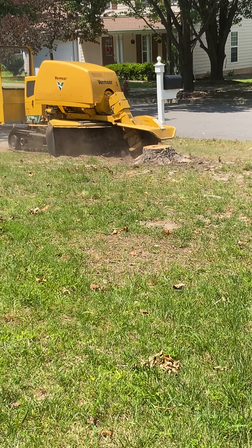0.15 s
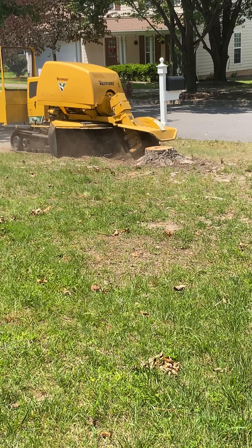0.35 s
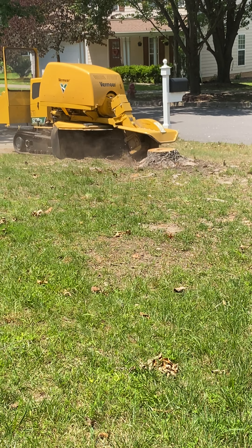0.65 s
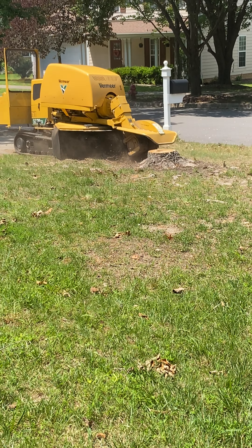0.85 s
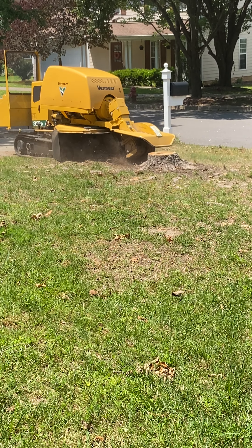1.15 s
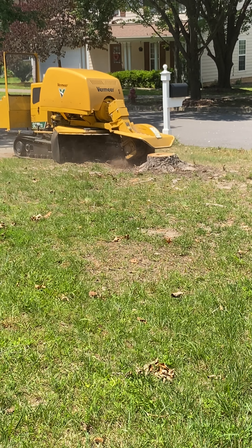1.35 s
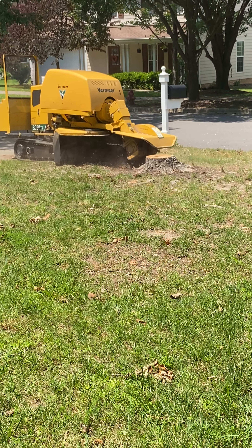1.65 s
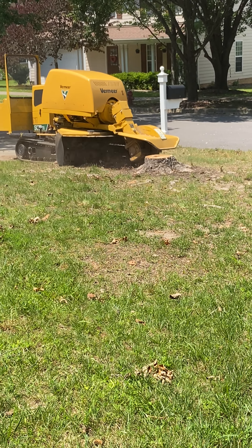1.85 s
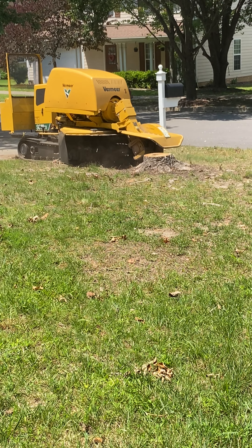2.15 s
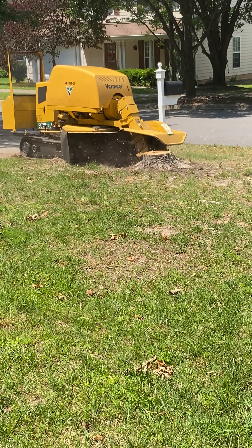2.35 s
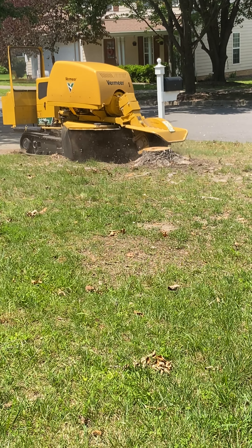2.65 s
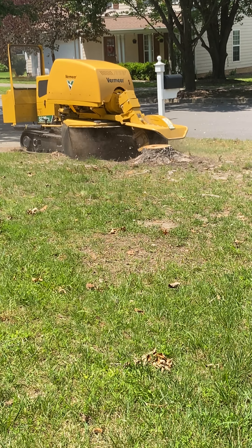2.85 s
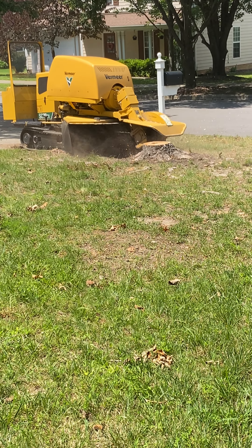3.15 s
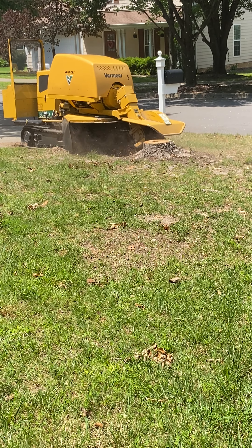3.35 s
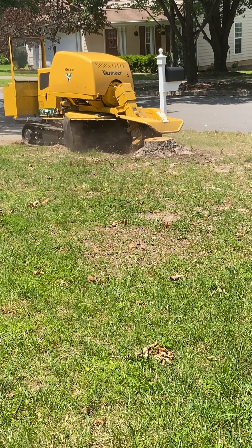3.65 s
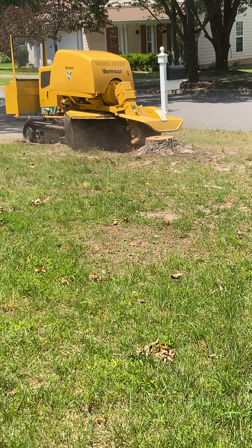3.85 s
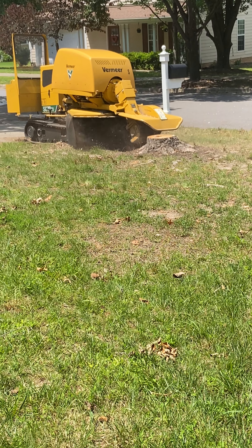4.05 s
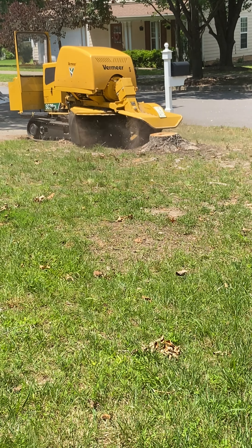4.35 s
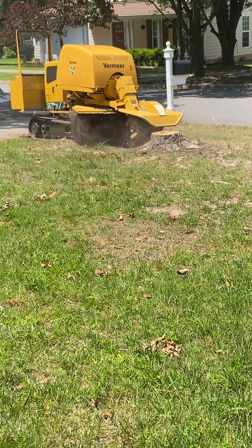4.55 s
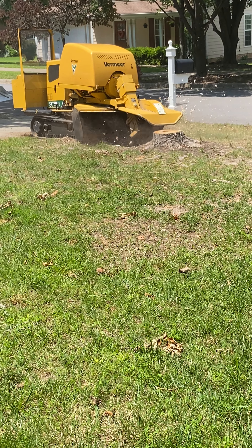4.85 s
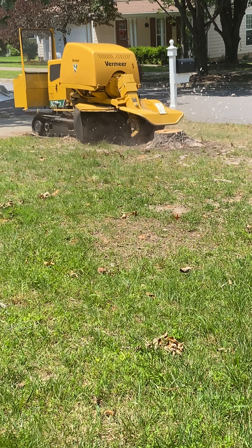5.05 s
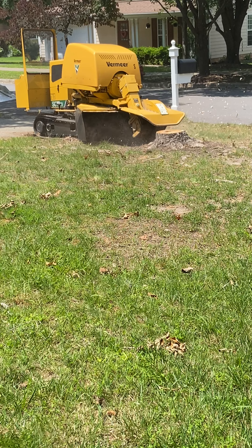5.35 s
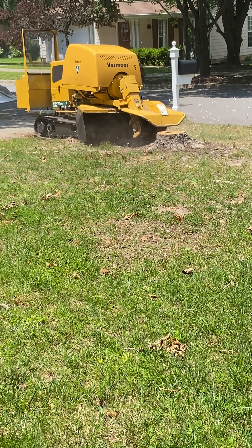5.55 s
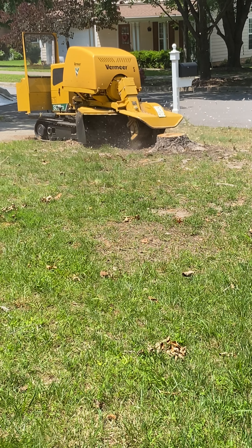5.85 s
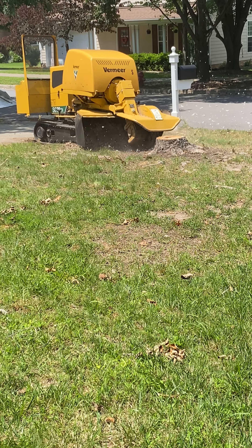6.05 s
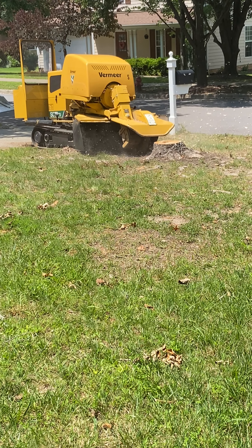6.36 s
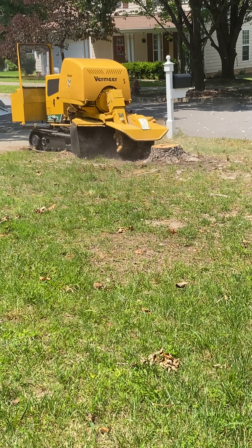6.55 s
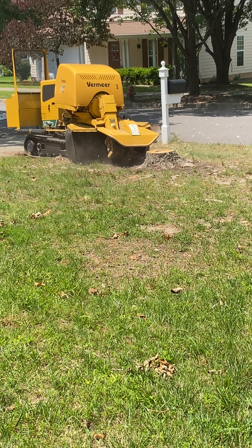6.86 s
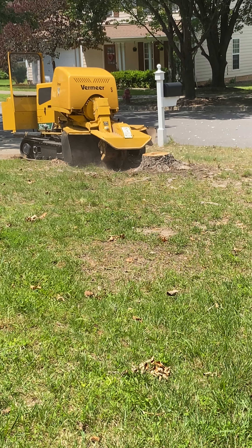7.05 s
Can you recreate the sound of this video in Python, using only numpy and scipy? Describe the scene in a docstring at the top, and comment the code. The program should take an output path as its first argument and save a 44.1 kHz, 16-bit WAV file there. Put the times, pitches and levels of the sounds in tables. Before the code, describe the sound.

A tracked grinder's engine hums continuously with fan whine and mechanical clatter. A light rasping pass with stone clacks, dull root booms and a gritty scrape gives way to a lull with a few ticks. Then a heavy pass crunches through wood, with hammering chatter, ringing steel and rough singing tones, pulling the engine pitch down before it climbs back. Open yard, slightly dull sound at moderate distance, faint house-front reflections.

```python
"""A stump grinder works outdoors: from the start its four-cylinder diesel drones while the toothed wheel thumps,
rasps and sprays chips. Stones clack, roots boom and squeaks flash by in both sweeps; a short scrape comes
near 0.6 s. From about 0.9 s the cutting fades; at 2.3 s the wheel goes back through the stump, steel and wood
sing, the wheel chatters, the guard clangs and chunks tear loose. The engine sags most near 5 s, then recovers.
Sines make the engine tones and filtered random blows the cutting; house fronts return a faint tail throughout."""
import sys
import numpy as np
from scipy import signal
from scipy.fft import rfft, irfft, next_fast_len
from scipy.io import wavfile
from scipy.ndimage import map_coordinates

SR = 44100
rng = np.random.default_rng(int(sys.argv[2]) if len(sys.argv) > 2 else 0)


def dump(signal):
    """Clip the signal to [-1, 1] and save it as 16-bit WAV at the path in sys.argv[1]."""
    limited = np.clip(np.atleast_2d(signal).T, -1, 1)
    pcm = np.round(limited * 32767).astype(np.int16)
    wavfile.write(sys.argv[1], SR, pcm)


N = 317520

# ringing notes of the steel guard and housing: (frequency [Hz], width [Hz], relative level [dB])
GUARD_MODES = [(905, 25, -2), (946, 23, -0.5), (1011.4, 23, 1), (1162, 19, 3.5), (1211, 24.4, 5),
               (1440, 59, -6), (1600, 77, -1), (1648, 45, -1), (1764, 34, 1.5), (2352, 68, -4.5)]
# bite of the teeth in the second sweep, back through the stump: (time [s], level [dB])
SECOND_SWEEP_BITE = [(2.29, -27.5), (2.43, -22), (2.69, -21.5), (2.745, -25), (2.77, -28.5), (2.87, -32.5),
                     (3.01, -29.5), (3.03, -34), (3.05, -26.5), (3.14, -19), (3.4, -23.5), (3.67, -20.5),
                     (3.82, -26.5), (4.22, -24.5), (4.42, -22), (4.75, -20.5), (5.16, -25.5), (5.19, -19),
                     (5.35, -24.5), (6.12, -27.5), (6.41, -24), (6.43, -28), (6.94, -34), (6.97, -36.5),
                     (7.2, -42)]
# lull in the skirt boom and overtone load: (start [s], end [s], fade [s], drop [dB])
BOOM_LULL = (1.01, 1.71, 0.17, 20)
# the wheel chatters in the deepest cuts: (start [s], end [s], level [dB])
CHATTER_SPELLS = [(2.378, 2.762, -30.5), (3.053, 3.75, -33), (4.376, 4.863, -27), (4.86, 5.365, -30.5)]
CHATTER_FADE_S = 0.055


def amp(db):
    """Turn decibels into a gain."""
    return 10 ** (np.asarray(db) / 20)


def unit(x):
    """Scale to an average power (rms) of 1."""
    return x / np.sqrt(np.mean(x ** 2) + 1e-20)


def along(points, hz):
    """Read (Hz, value) points at any frequency, on a log axis."""
    f, v = np.transpose(points)
    return np.interp(np.log(hz + 1), np.log(f + 1), v)


def curves(rows):
    """Give one value per sample for each column after the time."""
    s, *cols = np.transpose(rows)
    return [np.interp(np.arange(N) / SR, s, c) for c in cols]


def swing(rows):
    """Give a dB curve as rises and falls about its own mean."""
    db, = curves(rows)
    return db - db.mean()


def wobble(rate):
    """Draw a smooth random curve with rate knots a second."""
    knots = rng.standard_normal(int(N * rate / SR) + 4)
    return map_coordinates(knots, [np.arange(N) * rate / SR])


def window(start, end, fade):
    """Fade a level in from start and out towards end (all in seconds)."""
    t = np.arange(N) / SR
    return np.clip(np.minimum(t - start, end - t) / fade, 0, 1)


def lull(start, end, fade, drop_db):
    """Dip in dB between two times, with fades centred on its edges."""
    t = np.arange(N) / SR
    return -drop_db * np.clip(np.minimum(t - start, end - t) / fade + .5, 0, 1)


def filtered(x, response):
    """Multiply the spectrum of x by a complex response of frequency."""
    size = 2 * next_fast_len(N // 2 + SR // 4)
    return irfft(rfft(x, size) * response(np.fft.rfftfreq(size, 1 / SR)), size)[..., :N]


def coloured(x, spectrum):
    """Filter with the gain of (Hz, dB) points, without any sound ahead of its cause."""
    def response(hz):
        # folding the cepstrum forward in time makes the filter causal
        cepstrum = irfft(np.log(amp(along(spectrum, hz))))
        cepstrum[1:len(hz) - 1] *= 2
        cepstrum[len(hz):] = 0
        return np.exp(rfft(cepstrum))
    return filtered(x, response)


def resonant(x, modes):
    """Let x ring a body with (Hz, width, dB) modes of alternating sign."""
    def response(f):
        total = 0
        for k, (c, w, db) in enumerate(modes):
            total = total + (-1) ** k * amp(db) * 1j * f * w / (c * c - f * f + 1j * f * w)
        return total
    return filtered(x, response)


def wandering(x, modes, note, focus, drift_db):
    """Ring modes of drifting strength; those near the moving note speak most (focus: log-frequency width)."""
    hz, = curves(note)
    gains = np.array([(np.exp(-(np.log(c / hz) / focus) ** 2) + 0.76) * amp(drift_db * wobble(6))
                      for c, w, db in modes])
    gains /= np.linalg.norm(gains, axis=0)
    return unit(sum((-1) ** k * gains[k] * resonant(x, [mode]) for k, mode in enumerate(modes)))


def impacts(rate, spread_db):
    """Make tiny blows at random times, rate a second, with random sizes and signs."""
    struck = rng.random(N) < rate / SR
    signs = np.sign(rng.standard_normal(N))
    sizes = amp(spread_db * np.clip(rng.standard_normal(N), -2, 2))
    return unit(struck * signs * sizes)


def bursts(cycles, decay, scatter_db):
    """Shape one fading burst a cycle, each of a new size; decay is its time constant in cycles."""
    index = cycles.astype(int)
    sizes = amp(scatter_db * rng.standard_normal(index.max() + 1))
    return unit(sizes[index] * np.exp(-(cycles % 1) / decay))


def strokes(times, levels_db, attack, t60):
    """Shape blows that rise quickly and die by 60 dB in t60 seconds."""
    out, t = np.zeros(N + SR), np.arange(SR // 3) / SR
    for s, db in zip(times, levels_db):
        out[round(s * SR):][:len(t)] += amp(db - 60 * t / t60) * (1 - np.exp(-t / attack))
    return out[:N]


def driven(law, bite_db, strain):
    """Level in dB of a part that follows the bite and the strain (0-1)."""
    db, growth, strain_db = law
    return db + growth * bite_db + strain_db * strain


def exhaust(turns, load_db):
    """Hum on multiples of the crankshaft speed; the overtones swell under load and flutter."""
    # once-a-turn shake under load, before trims: (time [s], level [dB])
    shake_points = [(2.3, -43), (2.34, -32), (2.72, -34), (3.02, -69), (3.09, -47), (4.22, -25.5),
                    (4.81, -29), (4.91, -49), (5.1, -35), (5.7, -33), (5.9, -25.5), (6.39, -25),
                    (7.09, -66), (7.2, -32)]
    # firing tone, twice a turn, before trims: (time [s], level [dB])
    firing_points = [(2.45, -37.5), (2.71, -29), (3.04, -42), (3.23, -35), (3.39, -43), (3.53, -30.5),
                     (3.68, -30.5), (3.84, -41), (3.94, -31), (4.34, -38), (4.67, -30), (5.31, -41.5),
                     (5.52, -34.5), (5.74, -50), (6.11, -27), (6.29, -34), (7.01, -37), (7.2, -46)]
    # engine eases between sweeps: (start [s], end [s], fade [s], drop [dB])
    eased = (0.89, 2.36, 0.12, 10)
    # exhaust overtones: (multiple of crankshaft speed, relative level [dB])
    overtones = [(2.5, -55), (3, -47), (4, -42.5), (4.5, -53), (5, -42.5), (6, -42.5), (8, -49), (11, -54),
                 (12, -48.5)]

    def tone(order):
        return np.sqrt(2) * np.sin(2 * np.pi * (order * turns + rng.random()))

    def flutter_db():
        return 2.5 * wobble(2.5) + 2 * wobble(25)

    eased_db = lull(*eased)
    shake_db = curves(shake_points)[0] + eased_db - 5.5 + 1.7 * wobble(20)
    firing_db = curves(firing_points)[0] + eased_db + 0.5 + 2.0 * wobble(10)
    low = amp(shake_db) * tone(1) + amp(firing_db) * tone(2)
    upper = sum(amp(db + 3.0 + flutter_db()) * tone(order) for order, db in overtones)
    # the governor can only add so much fuel, so the swell levels off
    return low + amp(0.81 * np.minimum(load_db, 4)) * upper


def whines(turns):
    """Fan blades and timing gears hum on multiples of the crankshaft speed, whatever the load."""
    # fan and gear tones: (multiple of crankshaft speed, mean level [dB])
    gear_tones = [(10, -39.5), (14.5, -54), (20.5, -45), (21.5, -51), (22.5, -46.5), (30, -49.5),
                  (32, -48.5), (36.2, -45)]
    out = np.zeros(N)
    for order, db in gear_tones:
        level = amp(db + 1.7 * wobble(9)) * np.sqrt(2)
        out += level * np.sin(2 * np.pi * order * turns + 0.17 * wobble(25))
    return out


def clatter(turns):
    """Valves and injectors repeat a pattern every two turns; each firing adds a noisy knock."""
    # sound colour of the engine block: (frequency [Hz], relative level [dB])
    block_colour = [(30, -64), (55, -33), (130, -29), (220, -2), (280, -5.5), (350, -2.5), (450, 1.5),
                    (700, -1), (900, -3.5), (1050, 2), (1350, -1), (1750, 0), (2300, -4), (3200, -10.5),
                    (5500, -23.5), (12000, -55)]
    pattern = rng.standard_normal(2048)
    place = (turns / 2 % 1) * len(pattern) + 0.25 * wobble(67)
    repeating = map_coordinates(pattern, [place], mode="grid-wrap")
    knock = rng.standard_normal(N) * bursts(2 * turns, decay=1.0, scatter_db=0.5)
    lope = 1 + 0.054 * np.cos(2 * np.pi * turns)
    noise = 1.1 * repeating + knock
    return amp(-31.0) * unit(coloured(noise * lope, block_colour))


def soil_thump(teeth, bite_db, strain):
    """Teeth hit soil and root with many small, dull blows."""
    # (level at average bite [dB], growth [dB per dB of bite], extra at full strain [dB])
    law = (-31.5, 0.087, 1)
    # lull in the thump between sweeps: (start [s], end [s], fade [s], drop [dB])
    thump_lull = (0.89, 2.51, 0.16, 14)
    # sound colour of the soil: (frequency [Hz], relative level [dB])
    soil_colour = [(25, -34), (42, -21), (60, -5.5), (110, -1), (150, -1.5), (180, 1), (250, -5.5),
                   (340, -8), (480, -15), (900, -71.5)]
    level_db = driven(law, bite_db, strain) + lull(*thump_lull)
    return amp(level_db) * unit(coloured(teeth() * impacts(1500, spread_db=0.5), soil_colour))


def skirt_boom(teeth, bite_db, strain):
    """The blows make the hollow under the skirt boom, less and less as the stump is cut down."""
    # (level at average bite [dB], growth [dB per dB of bite], extra at full strain [dB])
    law = (-29.5, 0.41, 0.29)
    # notes of the hollow: (frequency [Hz], width [Hz], relative level [dB])
    hollow_modes = [(173.5, 33, 0), (208.3, 25, 1), (240, 18.4, 1.5), (304, 45, -8.5)]
    # centre of the boom: (time [s], frequency [Hz])
    boom_centre = [(0, 219), (0.6, 230), (0.87, 200), (1.1, 240), (2.55, 225), (2.8, 199), (3.15, 232),
                   (3.65, 240), (4.1, 174), (4.9, 196), (5.5, 210), (6.1, 183), (7.2, 197)]
    wane_db_per_s, skim_db = 1.1, -4.5  # the first sweep only skims the stump and booms less
    cutting_s = np.maximum(np.arange(N) / SR - SECOND_SWEEP_BITE[0][0], 0)
    level_db = driven(law, bite_db, strain) + lull(*BOOM_LULL)
    level_db += np.where(cutting_s > 0, -wane_db_per_s * cutting_s, skim_db)
    blows = teeth() * impacts(1500, spread_db=3.5)
    return amp(level_db) * wandering(blows, hollow_modes, boom_centre, focus=0.18, drift_db=2.0)


def wood_tear(teeth, bite_db, strain):
    """Tearing fibres ring the stump, at a new pitch as the cut moves through it."""
    # (level at average bite [dB], growth [dB per dB of bite], change at full strain [dB])
    law = (-32, 1, -0.26)
    # notes of the wood: (frequency [Hz], width [Hz], relative level [dB])
    wood_modes = [(411, 22, 3.5), (456.2, 14.8, 0.5), (490.3, 13.5, -0.5), (541, 24, -2), (584.5, 11.7, 4),
                  (643.6, 17.5, 2.5), (712, 30, 0.5)]
    # centre of the ringing wood: (time [s], frequency [Hz])
    wood_centre = [(0, 484), (2.25, 510), (2.5, 467), (2.7, 560), (3.2, 560), (3.7, 544), (4.0, 460),
                   (4.3, 496), (4.65, 460), (4.88, 550), (5.2, 507), (5.6, 458), (6.0, 444), (6.28, 550),
                   (6.65, 460), (7.2, 467)]
    level_db = driven(law, bite_db, strain) + 0.33 * wobble(60)
    fibres = teeth() * impacts(900, spread_db=1.5)
    return amp(level_db) * wandering(fibres, wood_modes, wood_centre, focus=0.27, drift_db=1.5)


def guard_ring(teeth, bite_db, strain):
    """The blows of the teeth ring the steel guard."""
    # (level at average bite [dB], growth [dB per dB of bite], extra at full strain [dB])
    law = (-33, 0.59, 1.2)
    blows = teeth() * impacts(5000, spread_db=5.5)
    return amp(driven(law, bite_db, strain)) * unit(resonant(blows, GUARD_MODES))


def wood_rasp(teeth, bite_db, strain):
    """Thousands of tiny blows a second make the rough rasp of the cut."""
    # (level at average bite [dB], growth [dB per dB of bite], extra at full strain [dB])
    law = (-31.5, 0.83, 0.46)
    # sound colour of the rasp: (frequency [Hz], relative level [dB])
    rasp_colour = [(250, -42.5), (380, -12.5), (650, 6), (900, -4), (1250, 4.5), (1370, 1), (1600, -1),
                   (2200, -3.5), (2480, -8.5), (2900, -4), (3600, -5), (6000, -25.5), (9000, -54)]
    blows = teeth() * impacts(6000, spread_db=2.0)
    return amp(driven(law, bite_db, strain)) * unit(coloured(blows, rasp_colour))


def disc_ring(teeth, bite_db, strain):
    """Rubbing noise in tooth bursts rings the steel disc in a low and a high group of notes."""
    # both laws: (level at average bite [dB], growth [dB per dB of bite], extra at full strain [dB])
    low_law = (-42.5, 0.69, 3.6)
    high_law = (-39.5, 0.58, 0.92)
    # both groups of disc notes: (frequency [Hz], width [Hz], relative level [dB])
    low_modes = [(797.5, 8, 4.5), (834.5, 16, 1.5)]
    high_modes = [(2685, 69, -4), (2858, 66, -0.5), (2955, 41, -6)]
    rub = teeth() * rng.standard_normal(N)
    low = amp(driven(low_law, bite_db, strain)) * unit(resonant(rub, low_modes))
    high = amp(driven(high_law, bite_db, strain)) * unit(resonant(rub, high_modes))
    return low + high


def chip_spray(wheel_turns, bite):
    """Chips leave in clumps and patter on the guard and the skirt."""
    # flow of chips, used as a swing about its mean: (time [s], level [dB])
    flow_points = [(0.0, -57.5), (0.14, -65), (0.38, -62), (0.4, -64.5), (1.62, -64.5), (1.72, -70),
                   (2.19, -67), (2.34, -59.5), (2.56, -59.5), (2.65, -57.5), (2.73, -63.5), (3.15, -60.5),
                   (4.03, -62.5), (4.63, -56), (5.59, -63), (5.83, -57.5), (7.16, -68.5), (7.2, -68)]
    # sound colour of the chips: (frequency [Hz], relative level [dB])
    chip_colour = [(700, -15), (1600, 1), (2250, 3), (2480, -3.5), (2850, 1.5), (3300, 5), (3700, -7),
                   (5000, -5.5), (6200, -15.5), (8000, -16), (10000, -12), (15000, -44.5)]
    clumps = bite * bursts(3 * wheel_turns + 0.21 * wobble(25) + 2, decay=2.2, scatter_db=1.5)
    patter = unit(coloured(clumps * impacts(6000, spread_db=0.0), chip_colour))
    return amp(-35.0 + 1.09 * swing(flow_points)) * patter


def wheel(turns, bite_db, sag):
    """Teeth strike in quick bursts, harder once each wheel turn, and ring soil, stump, guard and disc."""
    strain_sag = 2.5  # loss of speed that sets how soon strain builds up [turns a second]
    chatter_share = 0.36  # share of the even tear and rasp that gives way to hammering
    strain = 1 - np.exp(-(sag / strain_sag) ** 2)
    wheel_turns = .29 * turns + .08 * wobble(6)
    bite = amp(0.45 * np.cos(2 * np.pi * wheel_turns) + 0.6 * wobble(25))

    # teeth meet the ragged stump unevenly, so each part is struck in its own rhythm
    def teeth():
        cycles = 8 * wheel_turns + .25 * wobble(40) + 2
        return bite * amp(0.7 * wobble(9)) * bursts(cycles, decay=1.0, scatter_db=0.65)

    contact = (teeth, bite_db, strain)
    hammering = sum(window(start, end, CHATTER_FADE_S) for start, end, db in CHATTER_SPELLS)
    even = 1 - chatter_share * hammering
    cut = even * (wood_tear(*contact) + wood_rasp(*contact)) + chatter(wheel_turns)
    body = soil_thump(*contact) + skirt_boom(*contact) + guard_ring(*contact) + disc_ring(*contact)
    return body + cut + chip_spray(wheel_turns, bite)


def street(x):
    """The house fronts return a weak, late tail of decaying noise, different on each side."""
    # time for the echo to die by 60 dB: (frequency [Hz], time [s])
    echo_decay = [(100, 0.12), (1500, 0.062), (10000, 0.29)]
    hz, t, z = signal.stft(rng.standard_normal((2, SR // 2)), SR, nperseg=256)
    fading = z * amp(-60 * t / along(echo_decay, hz)[:, None])
    tail = signal.istft(fading, SR, nperseg=256)[1]
    delayed = np.pad(x, (SR // 30, 0))  # a thirtieth of a second late
    return signal.fftconvolve(delayed[None], tail / np.linalg.norm(tail[0]), axes=1)[:, :N]


def stones():
    """Stones and hard chips hit the guard: each gives a short crack and makes the steel ping."""
    # hits: (time [s], relative crack level [dB], relative ping level near 3 kHz [dB], 60 dB decay [s])
    stone_hits = [(0.119, -32, -28, 0.034), (0.1997, -29, -21, 0.033), (0.213, -46, -12.5, 0.053),
                  (0.3194, -40.5, -13.5, 0.055), (0.3433, -27, -10, 0.041), (0.3708, -25, -9, 0.043),
                  (0.4156, -37, -24, 0.03), (0.563, -35, -18, 0.057), (0.632, -29.5, -14, 0.029),
                  (1.1792, -34.5, -18, 0.055), (1.2415, -34, -40, 0.05), (1.4034, -24, -40, 0.013),
                  (1.4872, -30, -27, 0.03), (1.608, -36, -36, 0.018), (4.246, -32, -37.5, 0.025),
                  (4.289, -30, -33, 0.025), (4.6768, -35, -37, 0.05), (4.7584, -27, -29, 0.06),
                  (6.759, -33, -38, 0.057)]
    # sound colour of the cracks: (frequency [Hz], relative level [dB])
    crack_colour = [(500, -33), (1500, -2), (3000, 12), (5000, 10.5), (6500, -0.5), (10000, 3.5),
                    (15000, -40)]
    crack, ping, t = np.zeros(N + SR), np.zeros(N + SR), np.arange(SR // 8) / SR
    for s, db, ring_db, t60 in stone_hits:
        shape = amp(-60 * t / t60) * (1 - np.exp(-t / .0004))
        crack[round(s * SR):][:len(t)] += amp(db) * shape
        ping[round(s * SR):][:len(t)] += amp(ring_db) * shape
    grit = unit(coloured(impacts(9000, spread_db=5), crack_colour))
    steel_modes = [(2030, 440, -6.0), (2700, 410, 1.0), (3300, 700, -5.5)]
    steel = unit(resonant(rng.standard_normal(N), steel_modes))
    return amp(3.5) * crack[:N] * grit + amp(-9.0) * ping[:N] * steel


def bites():
    """A tooth that catches a whole root gives a short, dull boom: a quickly fading sine."""
    # bites into roots: (time [s], relative level [dB], pitch [Hz])
    root_bites = [(0.404, -14.5, 214), (0.853, -14, 182), (2.713, -10.5, 212), (2.741, -7.5, 131),
                  (4.6, -13, 141), (4.755, -6, 173.5), (6.331, -12, 170)]
    out, t = np.zeros(N + SR), np.arange(SR // 4) / SR
    for s, db, hz in root_bites:
        shape = amp(db - 3.5 - 60 * t / 0.1) * (1 - np.exp(-t / 0.0039))
        out[round(s * SR):][:len(t)] += shape * np.sin(2 * np.pi * hz * t)
    return out[:N]


def scrapes():
    """Teeth drag through grit: grains snap in quick, uneven bursts and make the teeth ring."""
    # scrapes: (start [s], end [s], level [dB])
    grit_spells = [(0.54, 0.725, -36)]
    level = sum(amp(db) * window(start, end, fade=0.038) for start, end, db in grit_spells)
    grains = impacts(2500, spread_db=4) * amp(3 * wobble(90))
    tooth_modes = [(2350, 410, -5), (2760, 340, -4), (3230, 220, -6)]
    return level * unit(resonant(grains, tooth_modes))


def squeak():
    """A tooth skids on hard wood, sticking and slipping for an instant: a wavering whistle."""
    # squeaks: (time of peak [s], frequency [Hz], peak level [dB], length [s])
    skids = [(0.578, 3170, -24, 0.0079), (0.599, 2800, -25, 0.0067), (0.698, 3350, -26, 0.005),
             (1.244, 4600, -36, 0.007), (2.657, 4100, -29, 0.014)]
    t, out = np.arange(N) / SR, np.zeros(N)
    for s, hz, db, length in skids:
        swell = amp(db) * np.exp(-((t - s) / length) ** 2)
        out += swell * np.sin(2 * np.pi * hz * t + 0.46 * wobble(300))
    return out


def singing():
    """Steel and wood sing while the wheel rubs: rough, wavering tones."""
    # tones: (start [s], end [s], first pitch [Hz], last pitch [Hz], relative level [dB], roughness [rad])
    singing_tones = [(2.304, 2.865, 2916, 2850, -40, 0.65), (4.327, 5.2, 414.2, 410, -35.5, 0.74),
                     (4.46, 4.8, 1020, 1012, -32, 0.44), (4.548, 4.776, 845, 830, -36, 0.48),
                     (4.744, 5.35, 1210, 1200, -35.5, 1.1), (4.85, 5.03, 800, 810, -30.5, 0.59),
                     (5.347, 5.756, 826, 836, -34, 0.9), (5.6, 5.74, 2780, 2830, -39, 0.4),
                     (5.68, 6.04, 2860, 2848, -38, 0.25), (5.979, 6.187, 2885, 2930, -38.5, 0.33),
                     (5.646, 6.11, 407.5, 420, -35, 0.98), (5.723, 6.025, 1750, 1785, -37, 0.71),
                     (5.783, 6.997, 1192, 1202, -37.5, 1.6), (6.566, 6.914, 798, 804, -40, 0.35),
                     (6.584, 6.93, 441.6, 448, -34.5, 0.71)]
    t, out = np.arange(N) / SR, np.zeros(N)
    for start, end, first_hz, last_hz, db, rough in singing_tones:
        cycles = np.cumsum(np.interp(t, [start, end], [first_hz, last_hz])) / SR
        level = amp(db + 3.5 + 3.2 * wobble(35)) * window(start, end, fade=0.05)
        out += level * np.sin(2 * np.pi * cycles + rough * wobble(70))
    return out


def chatter(wheel_turns):
    """The bouncing wheel lands tooth by tooth, unevenly; each blow is a short crack of wood."""
    level = sum(amp(db) * window(start, end, CHATTER_FADE_S) for start, end, db in CHATTER_SPELLS)
    blows = bursts(6 * wheel_turns + .25 * wobble(45) + 2, decay=0.2, scatter_db=2.5)
    wood_colour = [(150, -22), (420, 5), (700, 5.5), (1600, -5),
                   (2500, -15.5), (3400, -13.5), (6000, -23), (10000, -42)]
    return level * unit(coloured(blows * rng.standard_normal(N), wood_colour))


def clangs():
    """Hard blows of the wheel ring the guard's strongest note, rough from the rattling of its mounts."""
    # blows: (time [s], relative level [dB])
    hard_blows = [(2.47, -20), (2.55, -20), (2.67, -21), (4.484, -17), (4.548, -17.5), (4.695, -16.5),
                  (5.247, -22)]
    hz = max(GUARD_MODES, key=lambda mode: mode[2])[0]
    ring = np.sin(2 * np.pi * hz * np.arange(N) / SR + 0.44 * wobble(110))
    return amp(7.5) * strokes(*np.transpose(hard_blows), attack=0.006, t60=0.095) * ring


def crunches():
    """A chunk tears loose: snapping fibres, dull from the wood and bright from the splinters."""
    # chunks: (time [s], relative level of dull tear [dB], relative level of bright splintering [dB])
    chunk_breaks = [(2.541, -16, -35), (2.572, -20, -20), (2.614, -18, -16), (2.64, -23, -25),
                    (2.672, -22, -19), (2.701, -15, -26), (2.728, -21.5, -34), (3.087, -33, -23),
                    (3.117, -20, -36), (3.2, -24, -34), (3.28, -22, -32), (3.589, -15.5, -24),
                    (3.646, -20, -34), (4.365, -16, -30), (4.417, -15, -28), (4.49, -28, -19.5),
                    (4.601, -31, -19), (4.625, -25, -20), (4.679, -32, -17), (4.706, -19, -18.5),
                    (4.813, -17, -26), (4.895, -19, -33), (4.925, -26, -28), (5.148, -18, -25),
                    (5.175, -25, -26), (6.297, -23, -21.5)]
    # sound colours of the tear and the splinters: (frequency [Hz], relative level [dB])
    tear_colour = [(150, -43), (280, -25), (400, -1), (650, -5), (850, -16.5), (2000, -35), (8000, -75)]
    splinter_colour = [(200, -23), (500, -1), (760, -9), (1050, -8), (1350, -6), (1650, -0.5), (2400, -9.5),
                       (4000, -14), (8000, -29), (13000, -54)]
    attack_s, t60_s = 0.0031, 0.089
    s, tear_db, splinter_db = np.transpose(chunk_breaks)
    dull = unit(coloured(impacts(1500, spread_db=1.5), tear_colour))
    bright = unit(coloured(impacts(1400, spread_db=4), splinter_colour))
    tear = strokes(s, tear_db, attack_s, t60_s) * dull
    snap = strokes(s, splinter_db, attack_s, t60_s) * bright
    return amp(0.5) * (tear + snap)


def scene():
    """One crankshaft drives engine and wheel, the bite sets the load, and the sound leans slightly left."""
    # crankshaft speed before a tiny wobble: (time [s], speed [turns a second])
    speed_points = [(0, 48.8), (0.5, 48.7), (1, 48.15), (2.2, 48.2), (2.45, 46.7), (2.8, 45.9), (3.1, 48.6),
                    (3.55, 48.6), (3.8, 48.0), (4.05, 48.9), (4.35, 48.8), (4.68, 45.0), (4.85, 41.0),
                    (5.05, 39.4), (5.8, 45.4), (6.05, 46.2), (6.35, 48.4), (6.8, 49.5), (7.2, 48.7)]
    # bite of the teeth as the first sweep runs out of the wood: (time [s], level [dB])
    first_sweep_bite = [(0.0, -32), (0.37, -28), (0.41, -32.5), (0.8, -32), (0.92, -29.5), (1.06, -35.5),
                        (2.22, -40)]
    # side level against the middle: (frequency [Hz], level [dB])
    side_width = [(30, -67), (125, -35.5), (300, -23), (1300, -42), (2500, -12), (5000, -8.5), (10000, 0.5)]
    overtone_sag_db = 4.5  # the overtones' load falls this many dB per turn a second lost

    speed, = curves(speed_points)
    turns = np.cumsum(speed * (1 + .003 * wobble(15))) / SR
    bite_db = swing(first_sweep_bite + SECOND_SWEEP_BITE)
    sag = speed.max() - speed
    load_db = 3.0 + 0.94 * bite_db - overtone_sag_db * sag + lull(*BOOM_LULL)

    engine = exhaust(turns, load_db) + whines(turns) + clatter(turns)
    cutting = wheel(turns, bite_db, sag)
    short_events = stones() + bites() + scrapes() + squeak()
    stump_events = singing() + clangs() + crunches()
    machine = engine + cutting + short_events + stump_events

    # the left side is a little ahead in phase and slightly stronger
    side = filtered(machine, lambda hz: (0.039 + 1j) * amp(along(side_width, hz)))
    echo_colour = [(60, -47), (300, 11), (1200, 8.0), (3000, 8.0), (9000, 21.5)]
    echo = street(coloured(machine, echo_colour))
    return np.array([machine + side, machine - side]) + amp(-22.0) * echo


def record(dry):
    """The microphone dulls the treble; a steep low-pass ends the band."""
    # treble response, with a dip near 7 kHz: (frequency [Hz], level [dB])
    treble_response = [(6000, 0), (6700, -6.5), (7300, -42.5), (8000, -11), (10000, -14), (11500, -9.5),
                       (13000, -24), (15500, -11)]
    top_hz = 15700
    return filtered(coloured(dry, treble_response), lambda hz: hz < top_hz)


dry = scene()
out = record(dry)
dump(out)
```